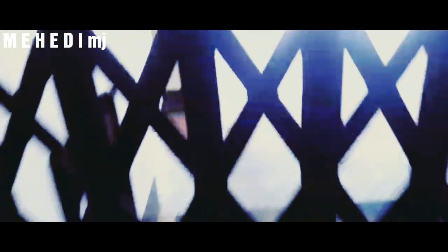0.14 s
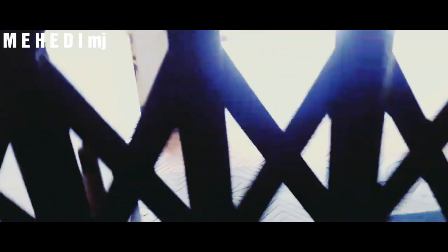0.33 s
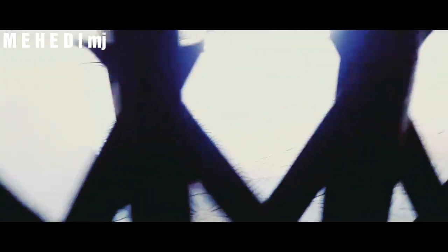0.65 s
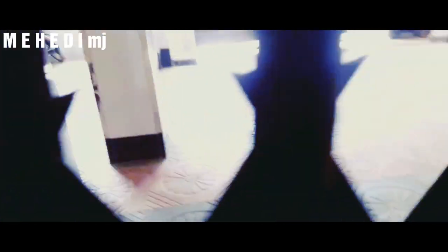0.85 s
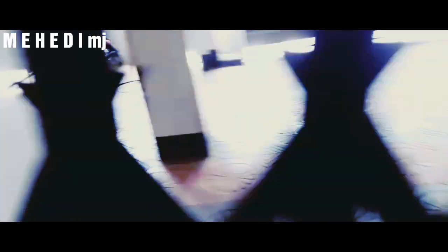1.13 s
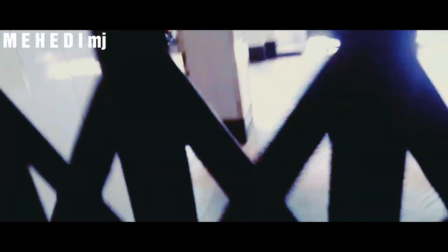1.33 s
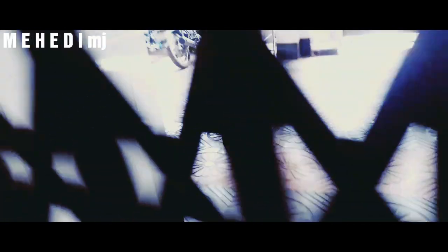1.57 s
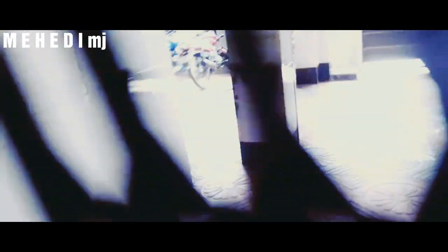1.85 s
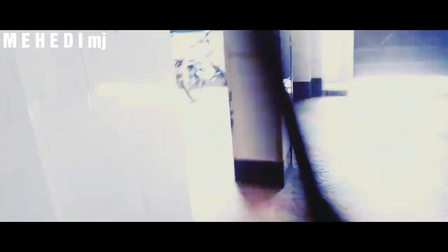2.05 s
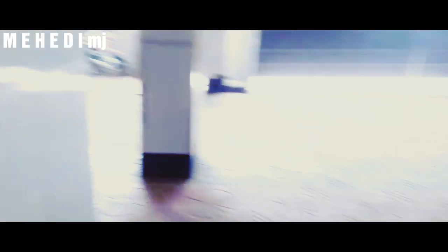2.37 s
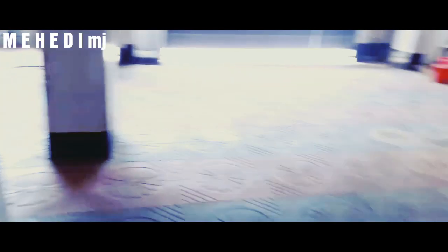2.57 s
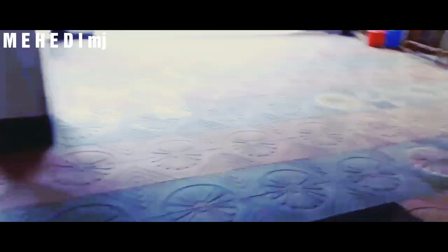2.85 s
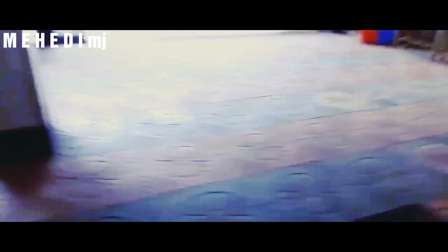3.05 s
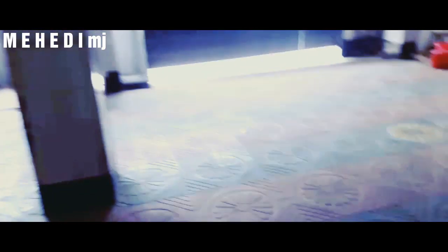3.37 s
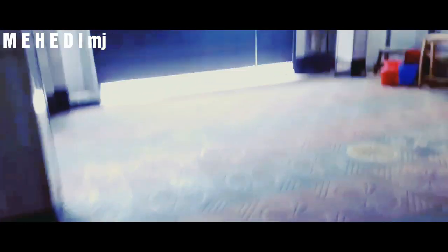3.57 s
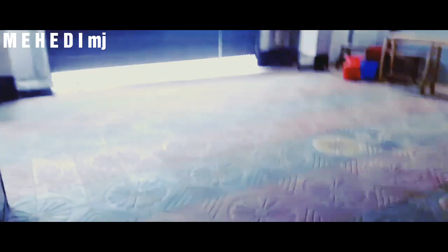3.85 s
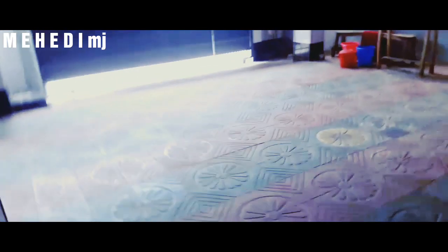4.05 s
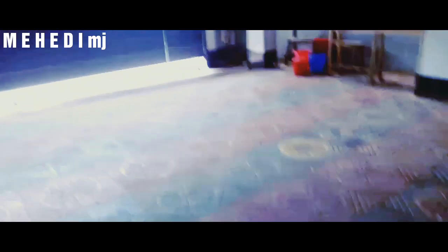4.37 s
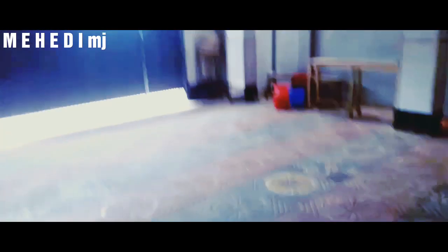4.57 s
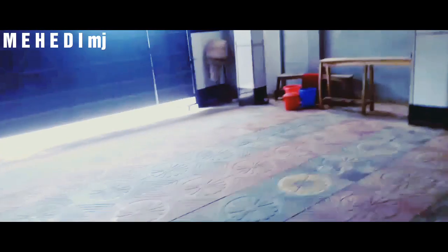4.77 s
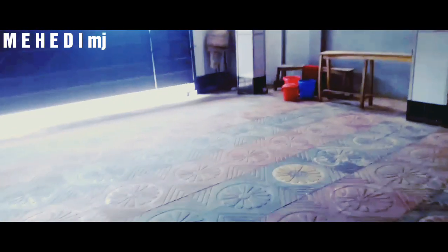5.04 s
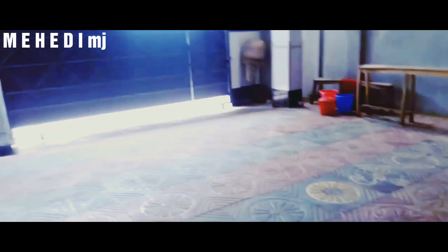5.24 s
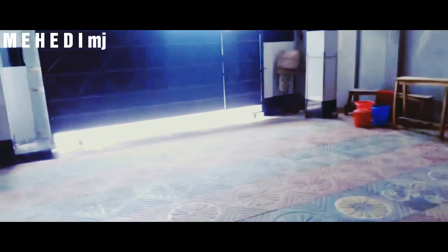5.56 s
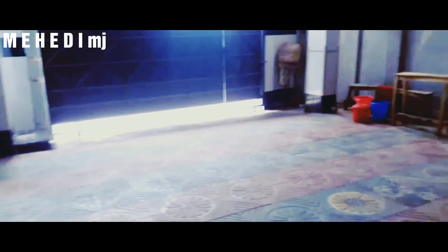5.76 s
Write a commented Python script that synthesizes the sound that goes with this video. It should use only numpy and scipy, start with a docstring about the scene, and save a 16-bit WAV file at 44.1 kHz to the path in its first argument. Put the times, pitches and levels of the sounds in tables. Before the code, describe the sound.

A faint, steady low wash fills a hard, echoing entrance hall, with very faint thin swishes and dull knocks in the first 0.6 seconds. At about 1.2 seconds steel bars clank in quick succession and a scissor gate starts to move, its rollers grinding grittily, growing louder until 2.0, riveted joints chattering and dry pivots squealing around 3 to 4 kilohertz. Low bumps lead into a bright, hard double clash at 2.3, with a knock on the floor; ringing and thin squeals trail into the echo until past 3. In the gap come soft knocks and a weak clank near 3.6, then a firm double knock at 4.0. Sharp clashes at 4.6 launch a second, deeper, quieter roll, with more gliding squeals, low bumps around 4.9 to 5.2, a clank at 5.3, and a last clank near 5.9. The sound is close, dense and brightly reverberant.

```python
"""A scissor gate is pushed twice in a hard, echoing entrance hall, over a faint wash of filtered noise.
Faint noise swishes and dull knocks (bursts of tiny impacts) come first; two clanks lead into the push.
Gritty rollers, chattering joints and gliding stick-slip squeals carry it, then bars clank and ring and
the frame bumps low. Knocks and a clank follow in the gap; the second push ends on squeals and a late clank.
Random-tap echoes surround gate and knocks; one close microphone hears it all."""
import sys
import numpy as np
from scipy import signal
from scipy.io import wavfile

SR = 44100
rng = np.random.default_rng(int(sys.argv[2]) if len(sys.argv) > 2 else 0)


def to_wav(s):
    """Save 16-bit WAV."""
    ch = np.atleast_2d(s).T  # columns
    pcm = np.round(np.clip(ch, -1, 1) * 32767)  # PCM
    wavfile.write(sys.argv[1], SR, pcm.astype(np.int16))


N = 260631
TIME = np.arange(N) / SR

# Levels in the tables are relative: each layer and the final mix add their own trims.
# Pushes of the gate: start_s, start_level_db, let_go_s, let_go_level_db
GATE_PUSHES = [(1.29, -27, 1.99, -19), (4.61, -31, 5.52, -33.5)]
# Bars striking each other: start_s, strength_db, bounce_decay_s, tilt_db_per_octave, lattice_rattle_db
BAR_CLANKS = [(1.186, -16, 0.014, -1, -26), (1.261, -23.5, 0.0137, -1, -43), (1.301, -11, 0.012, 2, -30),
              (1.398, -15.5, 0.025, 1.5, -22.5), (2.123, -18.5, 0.01, 6.5, -19),
              (2.28, -5.5, 0.0034, 7.5, -8.5), (2.316, -10, 0.00167, -4.5, -14),
              (3.599, -27, .008, -4, -62.5), (4.505, -31.5, 0.0293, -3.5, -38),
              (4.582, -13, 0.0027, 0, -24), (4.623, -6, 0.0029, 1.5, -16), (5.296, -9.5, 0.011, 2.5, -25.5),
              (5.881, -15, 0.0103, 0.5, -30)]
# Dull knocks and scuffs on the hard floor: start_s, level_db, time_to_swell_s, tilt_db_per_octave
FLOOR_KNOCKS = [(0.237, -35.5, 0.016, 0.5), (.265, -35, 0.025, 4), (.55, -37, 0.007, 5.5),
                (2.314, -10.5, 0.003, 2), (3.249, -38.5, .02, 3), (3.577, -22.5, 0.0084, 0.5),
                (3.59, -28, 0.0098, 0), (3.997, -17, 0.0013, -0.5), (4.004, -18, 0.0062, -1),
                (4.314, -35, .011, -1.5), (4.625, -25.5, .016, -5)]
# Squeals of dry pivots: start_s, length_s, start_pitch_hz, settled_pitch_hz, level_db, roughness (ratio)
PIVOT_SQUEALS = [(1.294, 0.052, 3250, 3150, -13.5, 1.17), (1.302, 0.063, 2983, 2813, -19.5, 0.65),
                 (1.39, 0.078, 8100, 8140, -29, 0.33), (1.527, 0.086, 3380, 3570, -26, 0.94),
                 (1.964, 0.21, 4354, 4385, -22.5, 0.45), (2.092, 0.17, 4420, 4560, -29.5, 0.29),
                 (2.4, 0.102, 3890, 3870, -22.5, 0.45), (2.5, .76, 3883, 3785, -37, 0.49),
                 (2.632, 0.081, 3320, 3380, -25.5, 0.31), (4.675, 0.172, 3580, 3635, -21.5, 0.71),
                 (4.682, 0.081, 6870, 7070, -27.5, 1.03), (4.714, 0.019, 3240, 3256, -14, 1),
                 (4.787, 0.229, 4320, 4130, -25.5, 0.57), (5.121, 0.69, 3860, 3797, -30.5, 0.52),
                 (4.824, 0.042, 4530, 4420, -25.5, 0.71), (5.766, 0.066, 6760, 6300, -39.5, .05),
                 (5.843, 0.0263, 13900, 13700, -40, 0)]
# Low bumps as the frame jolts: start_s, level_db, starting_pitch_hz
FRAME_BUMPS = [(2.086, -30, 120), (2.19, -36.5, 81.4), (4.929, -24.5, 102), (5.155, -26, 105)]
# Light rubbing close to the microphone: start_s, length_s, level_db
CLOSE_RUBS = [(0, .12, -61), (.15, .68, -60), (3.66, .05, -54)]
# Colour of rollers in the track: frequency_hz, density_db (per Hz)
TRACK_COLOUR = [(40, -52.5), (110, -12.5), (190, -1.5), (300, 2), (400, -0.5), (650, -3), (1000, 1.5),
                (1500, -1), (2500, -3), (6500, -35.5), (8000, -33.5), (15000, -32.5)]
# Colour of struck steel: frequency_hz, density_db (per Hz)
STEEL_COLOUR = [(150, -33), (500, -14), (1400, -6), (1900, -1), (2200, 6.5), (2550, -5), (3500, 1),
                (4700, -2), (6500, -7.5), (7200, -12.5), (7900, -29), (8800, -18), (15000, -27.5)]
# Colour of a blow on the floor: frequency_hz, density_db (per Hz)
FLOOR_COLOUR = [(60, -26), (180, -10.5), (360, -6), (750, -2), (1200, -4.5), (1900, -4), (2700, -7.5),
                (4000, -13), (6500, -21), (8000, -42), (15000, -39.5)]
# Colour of rubbing: frequency_hz, density_db (per Hz)
RUB_COLOUR = [(3000, -27), (8000, -14.5), (11500, 0), (15000, -10)]
# Colour of the background wash: frequency_hz, density_db (per Hz)
AIR_COLOUR = [(25, -18), (140, -4.5), (420, -1.5), (900, -6.5), (1500, -10), (4000, -15), (6300, -20.5),
              (7900, -46), (15000, -37)]
# Ringing modes of the bars: pitch_hz, level_db, t60_s
BAR_MODES = [(316, 19.5, 1), (470.7, 19, 1), (1065, 2, 0.81), (2150, -3, 1), (2247, -9, 0.98),
             (2620, 1, 0.71), (2830, -9, 0.25), (3130, -2, .5), (3150, -2, .5), (3656, 19, 0.716),
             (3860, -6, 0.84)]
# Decay of the hall, before the early boost: frequency_hz, t60_s
HALL_DECAY = [(100, 1.8), (500, 1.06), (2000, 1.58), (4000, 1.24), (8000, 1), (15000, 0.89)]


def rollers(level_db=-2, lumpy_db=0.5, second_tilt_db=-4.5):
    """Rollers grind over grit as a rain of tiny impacts; the second stretch of track sounds deeper."""
    lumps = amp(level_db + lumpy_db * wander(N, hz=33.7))
    grit = contacts(N, per_s=2500, spread_db=4.5) * roll_level() * lumps
    second = TIME > GATE_PUSHES[1][0] - 0.5
    first_stretch = signal.oaconvolve(grit * ~second, colour(TRACK_COLOUR))[:N]
    second_stretch = signal.oaconvolve(grit * second, colour(TRACK_COLOUR, second_tilt_db))[:N]
    return first_stretch + second_stretch


def roll_level(coast_db_per_s=23, start_s=0.0065):
    """The rollers set off almost at once, follow the push, then coast down once let go."""
    gain = np.zeros(N)
    for start, start_db, let_go, let_go_db in GATE_PUSHES:
        db = np.interp(TIME, [start, let_go], [start_db, let_go_db])
        db -= coast_db_per_s * np.maximum(TIME - let_go, 0)
        gain += np.interp(TIME, [start - start_s, start], [0, 1]) * amp(db)
    return gain


def lattice(chatter_db=-6, clump_db=3, chatter_tilt_db=-1, clank_db=2):
    """Riveted joints chatter as the lattice shakes; whole bars touch, then collide and ring."""
    touch_s, touch_db, touch_decay_s = 0.019, -11, 0.02  # slack joints touch lightly before each clank
    joints = contacts(N, per_s=420, spread_db=3)
    chatter = joints * shake_level() * amp(chatter_db + clump_db * wander(N, hz=50.54))
    force = signal.oaconvolve(chatter, colour(STEEL_COLOUR, chatter_tilt_db))[:N]
    for start, db, decay, tilt_db, _ in BAR_CLANKS:
        steel = amp(clank_db) * colour(STEEL_COLOUR, tilt_db)
        touch = blow(db + touch_db, touch_decay_s, per_s=2700, spread_db=1.0, rise_s=0.0011)
        clank = blow(db, decay, per_s=3700, spread_db=1.5)
        add(force, start - touch_s, signal.oaconvolve(touch, steel))
        add(force, start, signal.oaconvolve(clank, steel))
    return bar_ring(force, ring_db=-18.0) + links()


def shake_level(roll_shake_db=-1, settle_db_per_s=59):
    """The lattice shakes with the rolling and with the dying rattle of each clank; the energies add."""
    power = (amp(roll_shake_db) * roll_level()) ** 2
    for start, _, _, _, rattle_db in BAR_CLANKS:
        age = np.maximum(TIME - start, 0)
        power += (TIME >= start) * amp(rattle_db - settle_db_per_s * age) ** 2
    return np.sqrt(power)


def blow(db, decay_s, per_s, spread_db, rise_s=0.00068):
    """Slack is taken up, then the bars meet in a dying flurry of bounces."""
    t = TIME[:SR // 3]
    swell = 1 - np.exp(-t / rise_s)
    fade = np.exp(-t / max(decay_s, 0.001))
    return amp(db) * contacts(len(t), per_s, spread_db) * swell * fade


def bar_ring(force, ring_db):
    """Every contact excites the long decaying modes of the steel bars."""
    t = TIME[:SR]
    ring = np.zeros(len(t))
    for hz, db, t60 in BAR_MODES:
        ring += amp(db - 60 * t / t60) * np.sin(2 * np.pi * (hz * t + rng.random()))
    return force + amp(ring_db) * signal.oaconvolve(force, ring / np.linalg.norm(ring))[:N]


def links(level_db=-6, per_s=9, spread_db=4, cycles=45, low_hz=1700, high_hz=6800, treble_db=-4.5, count=40):
    """Each loose link has its own short ping, jostled at random moments and as loud as the shaking."""
    out, t = np.zeros(N), TIME[:2048]
    for hz in np.geomspace(low_hz, high_hz, count) * rng.uniform(0.98, 1.03, count):
        ping = np.sin(2 * np.pi * hz * t) * np.exp(-np.pi * hz * t / cycles)
        ping = unit(ping) * amp(treble_db * np.log2(hz / low_hz))  # treble_db is per octave
        for moment, chance in rng.random((round(per_s * N / SR), 2)):
            add(out, moment * N / SR, ping * amp(spread_db * min(-np.log(1 - chance), 3)))
    return amp(level_db) * unit(out) * shake_level()


def pivots(level_db=-3.0, waver=0.01707, flutter_db=3, rasp_db=-6, rasp_hz=450):
    """Stick-slip locks on to one mode of a bar; uneven slips shake its pitch and spread it into a rasp."""
    glide_share, ease_db_per_s = 0.21, 8.5  # pitch settling time as a share of the squeal; level sinks
    octave_db, octave_fade_s = 8, 0.19  # the overtone is stronger in loud squeals and dies away
    sway_share, grip_s = 0.0068, 0.01  # slower sway of the pitch; rise and release time
    out = np.zeros(N)
    for start, length, start_hz, settled_hz, db, rough in PIVOT_SQUEALS:
        n = int(length * SR)
        t = TIME[:n]
        stumble = wander(n, hz=692.5) + wander(n, hz=60.87)
        glide = settled_hz + (start_hz - settled_hz) * np.exp(-t / (glide_share * length))
        hz = glide * (1 + rough * waver * stumble + sway_share * wander(n, hz=21.9))
        phase = 2 * np.pi * np.cumsum(hz) / SR
        octave = amp(db + octave_db) * np.exp(-t / octave_fade_s)
        slips = 1 + 2 * rough * amp(rasp_db) * wander(n, hz=2 * rasp_hz)
        flutter = amp(flutter_db * wander(n, hz=159))
        tone = (np.sin(phase) + octave * np.sin(2 * phase)) * slips * flutter
        # the pressure on the pivot comes and goes
        grip = np.minimum(np.minimum(t, length - t) / grip_s, 1) * amp(3 * wander(n, hz=30))
        add(out, start, amp(db + level_db - ease_db_per_s * t) * unit(tone * grip))
    return out


def knocks():
    """Blows on stone with no ring of their own; a longer contact swells like a scuff."""
    out, t = np.zeros(N), TIME[:SR // 3]
    for start, db, swell_s, tilt_db in FLOOR_KNOCKS:
        swell = t / swell_s * np.exp(1 - t / swell_s)
        force = contacts(len(t), per_s=7000, spread_db=3.5) * swell
        add(out, start, amp(db) * signal.oaconvolve(force, colour(FLOOR_COLOUR, tilt_db)))
    return out


def bumps(rise_s=0.024, sag_per_s=0.78, ragged=0.5, rebound_s=0.0543, rebound_db=-6):
    """The heavy frame shudders at a ragged, sagging pitch, and once more as it drops back."""
    out, t = np.zeros(N), TIME[:SR // 4]
    swell = (t / rise_s * np.exp(1 - t / rise_s)) ** 2
    for start, db, hz in FRAME_BUMPS:
        for at, bump_db in [(start, db), (start + rebound_s, db + rebound_db)]:
            pitch = hz * np.exp(-sag_per_s * t) * (1 + ragged * wander(len(t), hz=123))
            turns = np.cumsum(pitch) / SR
            add(out, at, amp(bump_db) * swell * np.sin(2 * np.pi * turns))
    return out


def rubbing():
    """Thin swishes of tapered noise, too faint to stir the hall."""
    out = np.zeros(N)
    for start, length, db in CLOSE_RUBS:
        n = int(length * SR)
        add(out, start, amp(db) * rng.standard_normal(n) * signal.windows.tukey(n, 0.7))
    return signal.oaconvolve(out, colour(RUB_COLOUR))[:N]


def air(level_db=-44.5, drift_db=0.6):
    """Wash of the street outside: coloured noise whose level drifts slightly."""
    wash = signal.oaconvolve(rng.standard_normal(N + SR), colour(AIR_COLOUR))[SR:SR + N]
    return amp(level_db + drift_db * wander(N, hz=18)) * unit(wash)


def hall(x, wet_db, early_db=5, early_s=0.31, gap_s=0.0028):
    """Dense echoes off tile and concrete, strongest early on; three echo patterns trade places steadily."""
    t, out = TIME[:SR * 3 // 2], np.zeros(N)
    for k in range(3):
        echoes = rng.standard_normal(len(t)) * (rng.random(len(t)) < 3000 / SR) * (t > gap_s)
        echoes *= 1 + amp(early_db) * np.exp(-t / early_s)
        hz, age, bands = signal.stft(echoes, SR, nperseg=256)
        fade = amp(-60 * age / read(HALL_DECAY, hz)[:, None])
        tail = signal.istft(bands * fade, SR, nperseg=256)[1]
        path = np.sqrt(2 / 3) * np.cos(np.pi * (TIME + k / 3))  # the three powers always sum to 1
        out += signal.fftconvolve(x * path, tail / np.linalg.norm(tail))[:N]
    return amp(wet_db) * out


def amp(db):
    """Decibels to gain."""
    return 10 ** (np.asarray(db) / 20)


def unit(x):
    """Scales to rms 1."""
    return x / np.sqrt(np.mean(x ** 2) + 1e-20)


def read(points, hz):
    """Reads a table along a log-frequency axis."""
    f, value = np.transpose(points)
    return np.interp(np.log(hz + 1), np.log(f + 1), value)


def add(mix, start_s, sound):
    """Mixes a sound in at its start time."""
    part = mix[max(round(start_s * SR), 0):][:len(sound)]
    part += sound[:len(part)]


def wander(n, hz):
    """Random drift in straight lines between normal random points, hz points a second."""
    knots = rng.standard_normal(4096)
    return np.interp(np.arange(n) / SR * hz % len(knots), np.arange(len(knots)), knots)


def colour(points, tilt_db=0, size=4096):
    """Causal impulse response of energy 1 with a given spectrum, tilted per octave around 2 kHz."""
    hz = abs(np.fft.fftfreq(size, 1 / SR))
    tilt = tilt_db * np.log2(np.maximum(hz, 250) / 2000)
    log_gain = np.log(amp(read(points, hz) + tilt))
    # minimum phase: the energy comes as early as the spectrum allows
    taps = np.fft.ifft(np.exp(np.conj(signal.hilbert(log_gain)))).real[:size // 2]
    return taps / np.linalg.norm(taps)


def contacts(n, per_s, spread_db):
    """Random tiny impacts of uneven size and either sign, rms 1."""
    size = amp(spread_db * np.minimum(rng.exponential(1, n), 3)) * rng.choice([-1, 1], n)
    return unit(size * (rng.random(n) < per_s / SR))


def scene():
    """Gate, squeals and knocks, direct and through the hall, over the dry bumps, rubbing and air."""
    gate, squeal, knock = rollers() + lattice(), pivots(), knocks()
    direct = amp(-1.5) * gate + amp(1.0) * squeal + amp(-1.5) * knock
    echo = hall(gate + squeal + amp(2) * knock, wet_db=-3)
    return (direct + echo + bumps() + rubbing() + air())[None]


def record(dry, low_cut_hz=46, high_cut_hz=15680, ceiling=1.2):
    """One small microphone on both channels: no deep bass, softly rounded peaks, then the band limit."""
    low_cut = signal.butter(2, low_cut_hz, "highpass", fs=SR, output="sos")
    heard = signal.sosfilt(low_cut, dry)
    rounded = ceiling * np.tanh(heard / ceiling)
    band_limit = signal.firwin(1023, high_cut_hz, window=("kaiser", 9), fs=SR)
    return np.repeat(signal.oaconvolve(rounded, band_limit[None], "same"), 2, axis=0)


dry = scene()
out = record(dry)
to_wav(out)
```